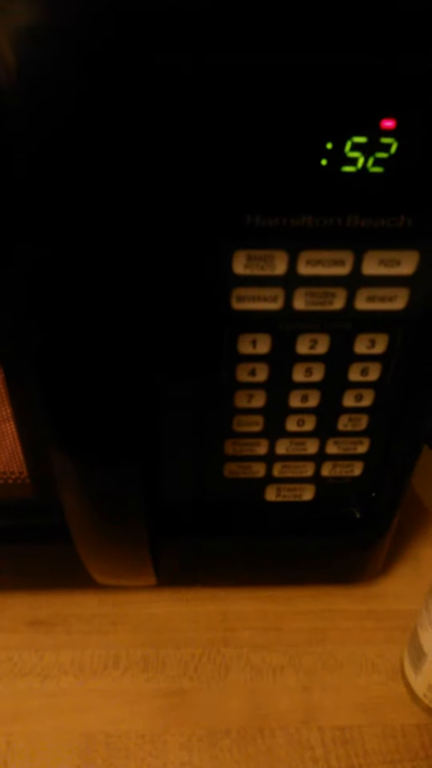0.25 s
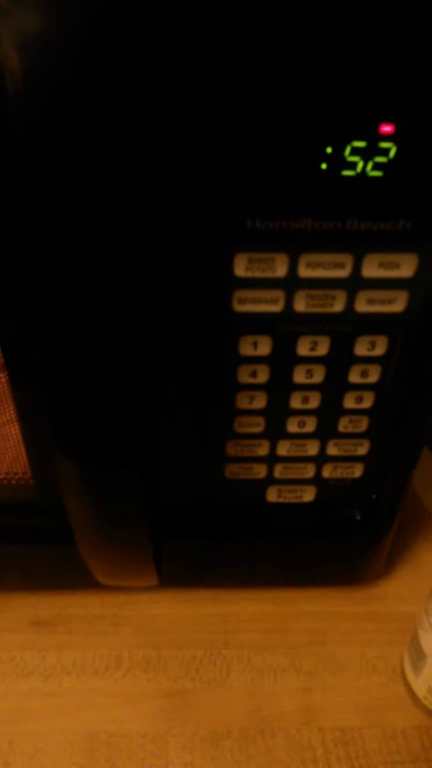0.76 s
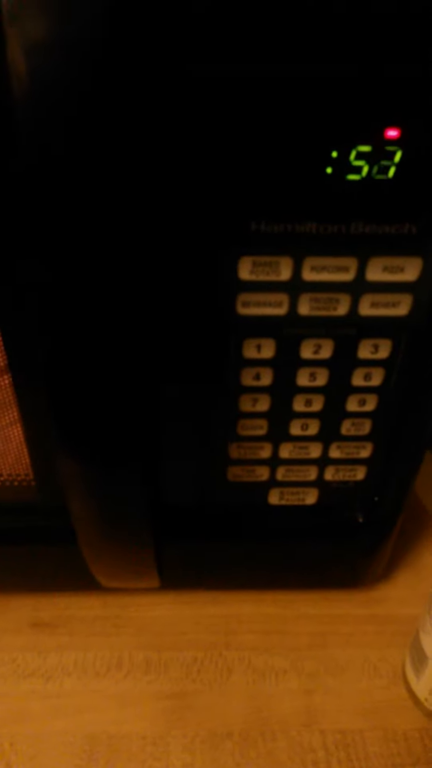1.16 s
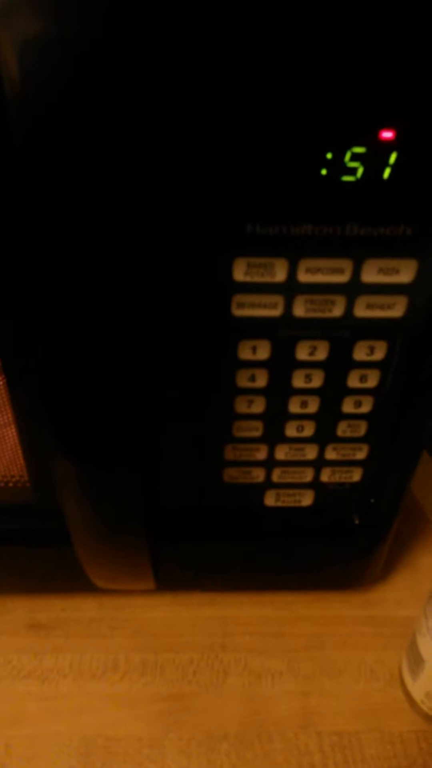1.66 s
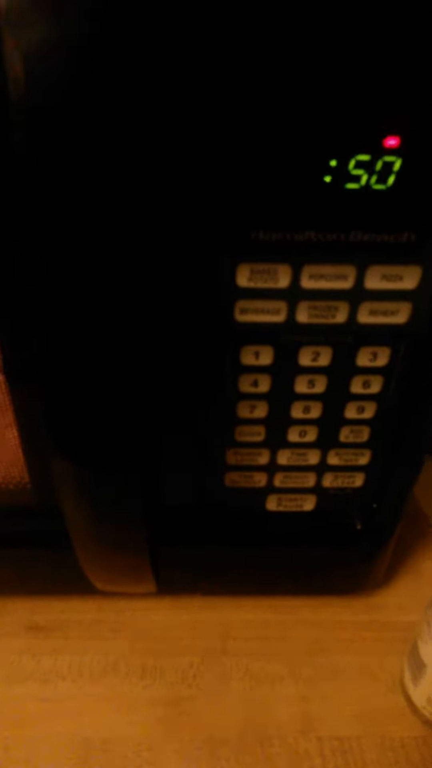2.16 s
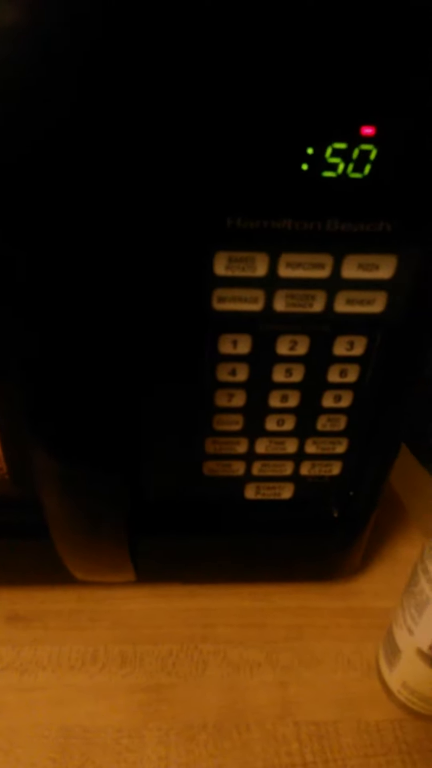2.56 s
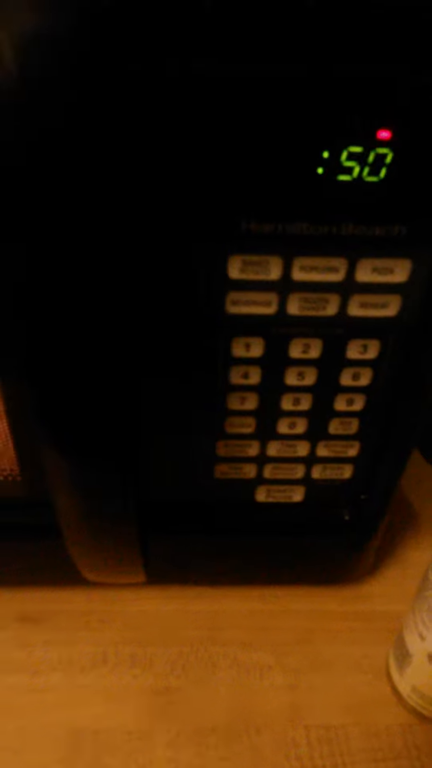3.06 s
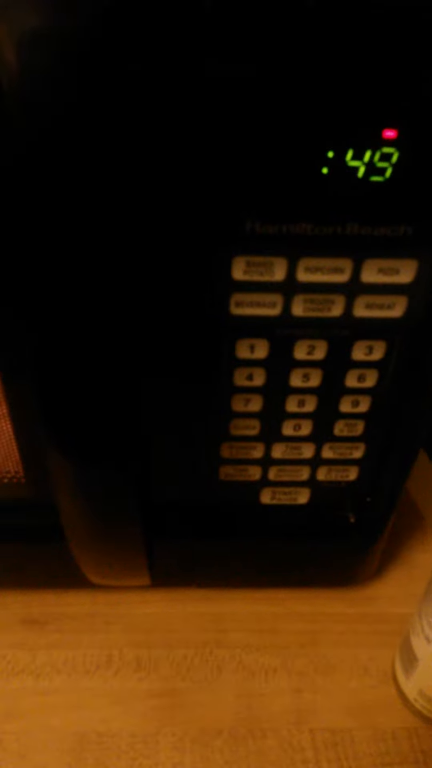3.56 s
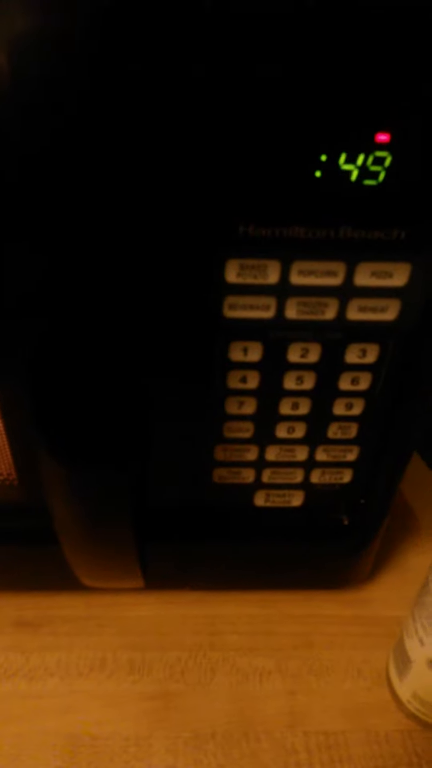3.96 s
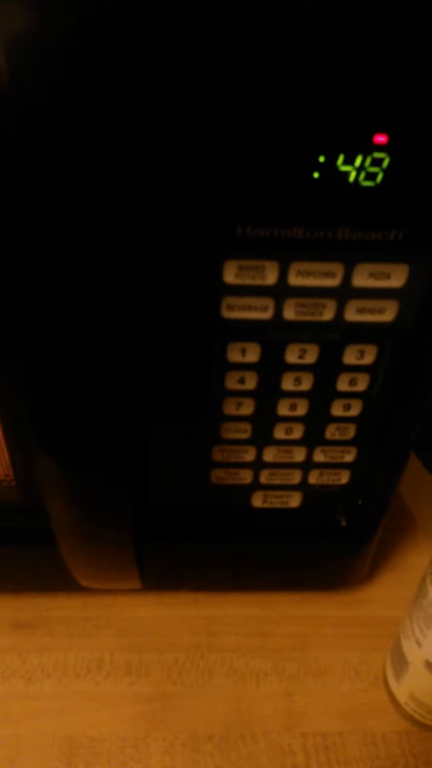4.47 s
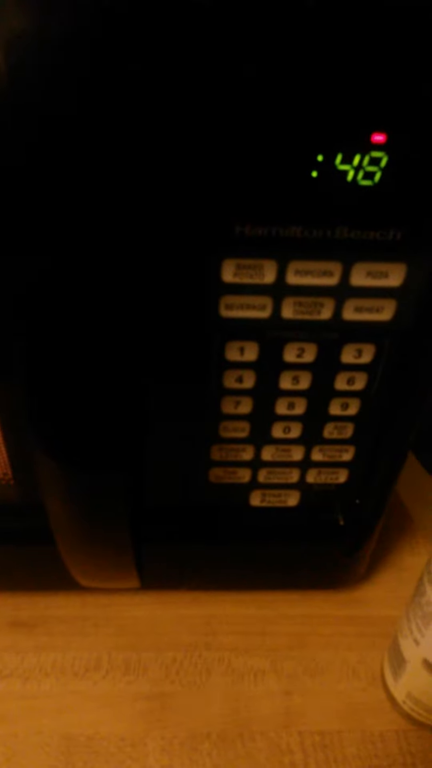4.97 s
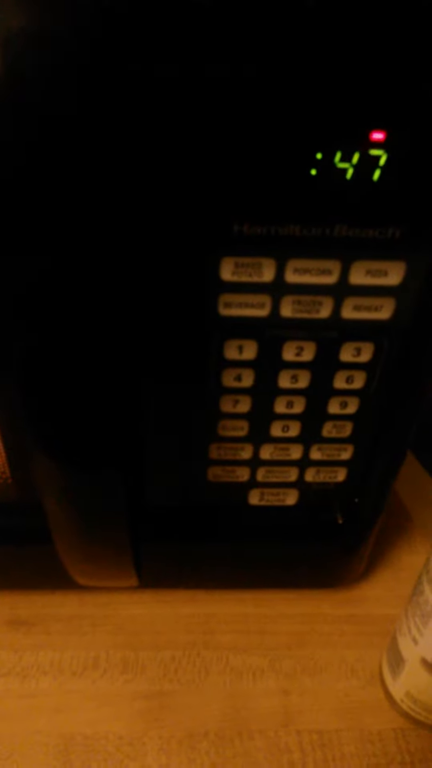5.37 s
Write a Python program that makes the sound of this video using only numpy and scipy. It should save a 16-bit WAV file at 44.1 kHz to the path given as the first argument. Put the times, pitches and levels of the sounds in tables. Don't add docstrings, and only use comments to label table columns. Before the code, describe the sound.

A microwave oven runs steadily with a low, slowly throbbing hum and airy fan rush, with a brief thin squeal midway.

```python
import sys
import numpy as np
from scipy import signal
from scipy.fft import rfft, irfft
from scipy.io import wavfile
from scipy.ndimage import uniform_filter1d

SR = 44100
rng = np.random.default_rng(int(sys.argv[2]) if len(sys.argv) > 2 else 0)


def to_wav(s):
    ch = np.atleast_2d(s).T
    pcm = np.round(np.clip(ch, -1, 1) * 32767)
    wavfile.write(sys.argv[1], SR, pcm.astype(np.int16))


def voltage_ratio(decibels):
    exponent = np.asarray(decibels, float) / 20
    return 10 ** exponent


N = 247401
T = np.arange(N) / SR
MAINS_HZ = 60.037

# f/Hz, left density/dB per Hz, right density/dB per Hz
RUSH = [(40, -86, -79), (66, -75, -82), (97, -73.5, -66.5), (194.6, -66, -60.5), (345, -86.5, -82),
        (429, -68, -74), (544, -71, -86), (650, -75.5, -71.5), (803, -85.5, -76.5), (887, -78, -84),
        (1440, -86, -78), (2080, -87, -75)]
# f/Hz, left density/dB per Hz, right density/dB per Hz
HISS = [(2450, -84, -85), (3260, -86.5, -89), (3650, -86.5, -93), (4430, -88, -90.5), (4820, -82, -94),
        (5960, -82.5, -92), (6510, -85, -94.5), (7140, -95.5, -91.5), (9460, -104.0, -96),
        (10700, -107.6, -91.0), (12000, -105.4, -88.5), (13500, -101.7, -94.5), (14500, -99, -93)]
# f/Hz, coherence/0-1, left lead/rad
PORT_LIKENESS = [(60, .97, -.15), (200, .96, -.3), (380, .7, -1.3), (560, .58, 0), (900, .48, -1.5),
                 (1300, .32, -1.5), (1600, .32, .4), (2500, .22, 1.0), (4000, .12, 1.5), (6400, .06, 1.5),
                 (14000, .01, 0)]
# f/Hz, width/Hz, left level/dB, right level/dB
CABINET_MODES = [(308, 51, 8.0, 6.2), (334, 59, 10.9, -0.7), (366, 29, 6.5, 7.0), (506, 99, -6.4, 9.0),
                 (705, 56, 7.8, 3.0), (784, 58, 12.2, 0.8), (832, 51, 4.0, 5.1), (911, 39, -1.2, 9.3),
                 (983, 56, -4.7, 4.2), (1179, 250, 4.7, 2.9), (1236, 38, -5.5, 2.0), (1276, 42, 3.8, 3.4)]
# f/Hz, width/Hz, left level/dB, right level/dB
HIGHER_MODES = [(1522, 64, 7.1, 0.4), (1576, 99, -2.9, 6.9), (1642, 250, 1.7, -7.8), (1770, 72, 4.9, 0.4),
                (1970, 46, 5.6, 2.7), (2046, 115, -0.8, -5.8), (2173, 53, 5.3, 4.3), (2254, 102, 1.8, -4.3),
                (2790, 111, -2.5, 2.8), (3182, 48, -2.6, -1.7), (3398, 250, -0.1, 4.3),
                (3558, 144, 4.7, -1.6)]
# top t/s, top f/Hz, rise/s, fall/s, level/dB
CHIRPS = [
    (2.488, 14280, .07, .055, -56.5),
    (2.605, 14250, .05, .05, -60),
    (2.655, 14200, .005, .045, -63),
    (2.75, 13700, .03, .015, -60),
    (2.795, 12550, .02, .055, -60),
]
# start t/s, hold/s, length/s, f/Hz, level/dB
SAGGING_WHINES = [
    (2.44, .07, .34, 13700, -67),
    (2.695, .045, .06, 11580, -67.5),
]
# t/s, centre f/Hz, width/Hz, left level/dB, right level/dB
GRIT_TICKS = [
    (.414, 3400, 300, -53, -52.5),
    (.41, 4600, 400, -49.5, -60),
    (2.408, 4000, 4500, -44.5, -54.5),
]
# t/s, centre f/Hz, width/Hz, left level/dB, right level/dB
GRIT_RUBS = [
    (2.47, 11300, 1200, -80, -56),
    (2.84, 11900, 700, -74, -57),
    (2.5, 14000, 900, -64, -59),
]
# multiple of mains, level over hiss/dB
PLATE_RATTLES = [(89, 10.5), (93, 11.5), (97, 11), (99, 23), (100, 17), (101, 17), (187, 13), (192, 11),
                 (194, 14.5), (204, 13), (205, 14.5), (206, 17), (218, 15.5), (221, 18.5)]
# multiple of shaft, left level/dB, right level/dB, left lead/rad
FAN_TONES = [(1, -57.5, -56.7, -0.1), (2, -44.5, -42.8, -0.2), (3, -55.5, -52.7, -0.4),
             (4, -32.0, -30.3, -0.3), (5, -58.5, -60.3, -0.3), (6, -52.6, -52.7, -0.5),
             (7, -61.3, -68.4, -0.1), (8, -42.2, -42.2, -1.4), (9, -63.6, -62.2, -0.8),
             (12, -59.7, -61.3, -0.6), (15, -61.1, -60.1, -0.5), (16, -57.0, -57.9, -1.4),
             (18, -64.0, -62.8, -1.2), (20, -64.3, -61.5, -1.2)]
# multiple of mains, multiple of shaft, left level/dB, right level/dB, left lead/rad
SUM_TONES = [(2, 1, -44, -44, 0), (2, 3, -57.5, -57.5, -.8), (4, 1, -61, -61, -.4)]
# multiple of mains, left level/dB, right level/dB, left lead/rad
HUM_TONES = [(1, -66.6, -61.4, -0.4), (2, -31.4, -29.0, -0.3), (3, -45.3, -42.8, -0.2),
             (4, -51.9, -45.8, 0.0), (5, -60.1, -61.5, 0.3), (6, -59.3, -45.8, 1.3), (8, -54.3, -52.9, 0.2),
             (10, -49.5, -49.7, 0.2), (11, -57.2, -58.3, -0.1), (12, -52.6, -47.8, 1.1),
             (14, -61.1, -58.3, -1.9), (16, -88.2, -75.6, -2.9), (18, -54.9, -67.7, -2.3),
             (20, -64.0, -59.4, -0.2), (22, -63.2, -58.4, -2.3), (24, -77.4, -64.4, -0.8),
             (26, -65.8, -56.4, 0.5), (27, -76.8, -68.0, -0.1), (28, -68.3, -58.2, 0.5),
             (30, -73.9, -69.3, 0.8), (34, -73.3, -67.9, 1.2), (36, -78.6, -69.1, 1.7),
             (40, -80.6, -76.6, 0.6)]
# f/Hz, left density/dB per Hz, right density/dB per Hz
GATE = [(3000, -110, -100), (5400, -105, -95.5), (7500, -102, -96.5), (9300, -103, -96.5),
        (11000, -104, -97), (14000, -99, -95.5), (14500, -96, -92)]


def walk(rate_hz, size=()):
    hold = int(SR / rate_hz)
    steps = rng.standard_normal(size + (N // hold + 1,))
    held = np.repeat(steps, hold, axis=-1)[..., :N]
    return 1.35 * uniform_filter1d(uniform_filter1d(held, hold), hold)


def tones(turns, left_db, right_db, lead_rad):
    phase = 2 * np.pi * (turns + rng.random())
    peak = np.sqrt(2) * voltage_ratio(np.array([[left_db], [right_db]]))
    return peak * np.sin([phase + lead_rad, phase])


def colour(table, hz):
    rows = np.array(table)
    return np.array([np.interp(np.log(hz + 1), np.log(rows[:, 0]), rows[:, k]) for k in (1, 2)])


def air():
    hiss_db = .6
    hz = np.arange(N // 2 + 1) * SR / N
    db = colour(list(RUSH) + list(HISS), hz)
    db = db - 30 * np.clip(np.log2(34 / (hz + 1)), 0, 1)
    for f, width_hz, *peak_db in [*CABINET_MODES, *HIGHER_MODES]:
        db = db + np.outer(peak_db, 1 / (1 + (2 * (hz - f) / width_hz) ** 2))

    coherence, lead_rad = colour(PORT_LIKENESS, hz)
    like = np.sqrt(coherence)
    common, *own = rfft(rng.standard_normal((3, N)))
    shared = common * np.array([np.exp(1j * lead_rad), np.ones(len(hz))])
    mixed = np.sqrt(like) * shared + np.sqrt(1 - like) * np.array(own)
    full = mixed * voltage_ratio(db) * np.sqrt(SR / 2)

    low = 1 / (1 + (hz / 2500) ** 4)
    rush = irfft(full * low, N) * voltage_ratio(.4 + .6 * walk(9))
    hiss = irfft(full * (1 - low), N) * voltage_ratio(hiss_db + .3 * walk(18, size=(2,)))
    return rush + hiss


def core_buzz():
    bed_db, scatter_db = 3.0, 3.5
    treble_hz, treble_db = 10000, 5
    orders = np.arange(42, 243)
    over_db = bed_db + scatter_db * rng.standard_normal(len(orders))
    over_db = over_db + treble_db * (orders * MAINS_HZ > treble_hz)
    for k, rattle_db in PLATE_RATTLES:
        over_db[round(k) - orders[0]] = rattle_db
    db = colour(HISS, orders * MAINS_HZ) + over_db

    size = 1 << 14
    spectrum = np.zeros((2, size // 2 + 1), complex)
    phase = np.exp(2j * np.pi * rng.random(db.shape))
    spectrum[:, orders] = voltage_ratio(db) * phase * size / np.sqrt(2)
    place = (MAINS_HZ * T % 1) * size
    return np.array([np.interp(place, np.arange(size), c, period=size) for c in irfft(spectrum, size)])


def squeak(start_s, end_s, hz, db, pan_db):
    edge_s = .012
    shape = np.clip(np.minimum(T - start_s, end_s - T) / edge_s, 0, 1)
    pitch_hz = np.clip(hz, 0, SR / 2) + 30 * walk(200)
    level = voltage_ratio(db + 1.8 * walk(50))
    return shape * level * tones(np.cumsum(pitch_hz) / SR, pan_db / 2, -pan_db / 2, 1.6)


def scrape(t_s, length_s, hz, width_hz, db):
    band = signal.butter(2, [hz - width_hz / 2, hz + width_hz / 2], "band", fs=SR, output="sos")
    grit = signal.sosfilt(band, rng.standard_normal((2, N)))
    return voltage_ratio(np.array(db))[:, None] * grit / grit.std() * np.exp(-((T - t_s) / length_s) ** 2)


def roller():
    bend_hz_per_s2, chirp_pan_db = 230000, -3
    ring_hz, ring_width_hz, off_ring_db = 13990, 300, -8
    sag_hz_per_s, fade_db_per_s, whine_pan_db = 5300, 32, (9, -14)
    tick_s, rub_s = .013, .03
    out = np.zeros((2, N))
    for top_s, hz, rise_s, fall_s, db in CHIRPS:
        pitch_hz = hz - bend_hz_per_s2 * (T - top_s) ** 2
        ring_db = off_ring_db * (1 - np.exp(-((pitch_hz - ring_hz) / ring_width_hz) ** 2))
        out += squeak(top_s - rise_s, top_s + fall_s, pitch_hz, db + ring_db, chirp_pan_db)
    for (start_s, hold_s, length_s, hz, db), pan_db in zip(SAGGING_WHINES, whine_pan_db):
        late_s = np.clip(T - start_s - hold_s, 0, length_s)
        pitch_hz = hz - sag_hz_per_s * late_s
        out += squeak(start_s, start_s + length_s, pitch_hz, db - fade_db_per_s * late_s, pan_db)
    for length_s, scrapes in ((tick_s, GRIT_TICKS), (rub_s, GRIT_RUBS)):
        for t_s, hz, width_hz, *db in scrapes:
            out += scrape(t_s, length_s, hz, width_hz, db)
    return out


def fan():
    start_turns = -.12
    shaft_hz = np.linspace(45.925, 45.966, N)
    shaft = start_turns + np.cumsum(shaft_hz) / SR
    out = sum(tones(round(k) * shaft, *rest) for k, *rest in FAN_TONES)
    out = out + sum(tones(round(m) * MAINS_HZ * T + round(k) * shaft, *rest) for m, k, *rest in SUM_TONES)
    whine_hz = 11918 + .5 * walk(3.2)
    return out + tones(np.cumsum(whine_hz) / SR, left_db=-105, right_db=-67.5, lead_rad=0)


def transformer():
    rise_db_per_s = 0.24
    hum = sum(tones(round(k) * MAINS_HZ * T, *rest) for k, *rest in HUM_TONES)
    return voltage_ratio(rise_db_per_s * (T - T.mean())) * hum


def scene():
    return air() + core_buzz() + roller() + fan() + transformer()


def roll_off(x):
    return signal.sosfilt(signal.butter(12, 14580, fs=SR, output="sos"), x)


def record(dry):
    hz, _, cells = signal.stft(dry, SR, nperseg=2048, scaling="psd")
    power = uniform_filter1d(2 * np.abs(cells) ** 2, size=8, axis=1)
    weak = power < voltage_ratio(2 * colour(GATE, hz))[:, :, None]
    shut = weak & (hz[:, None] > GATE[0][0])
    gated = signal.istft(cells * ~shut, SR, nperseg=2048, scaling="psd")[1][:, :N]
    mix = gated - .0005
    return roll_off(mix)


dry = scene()
out = record(dry)
to_wav(out)
```